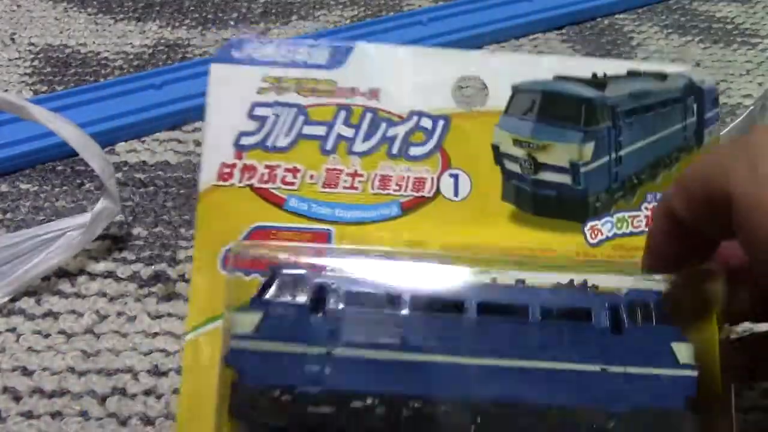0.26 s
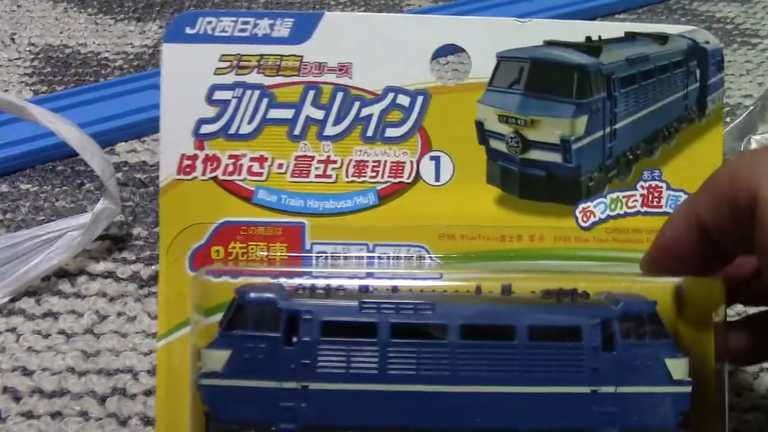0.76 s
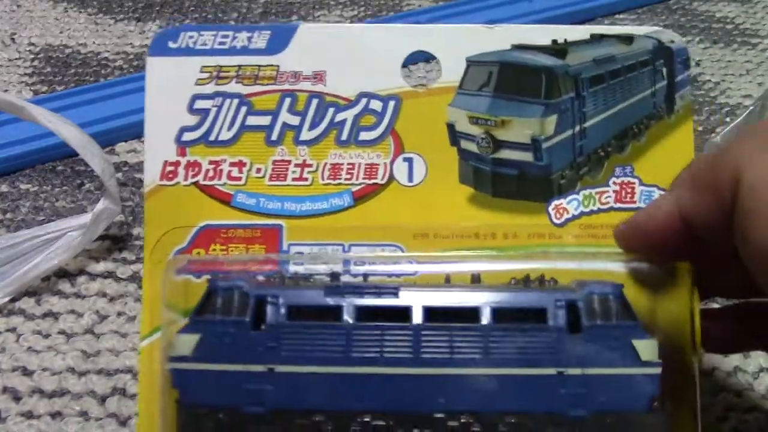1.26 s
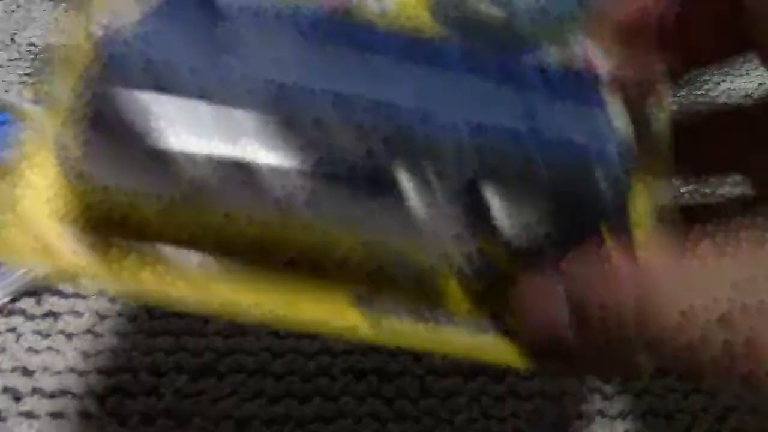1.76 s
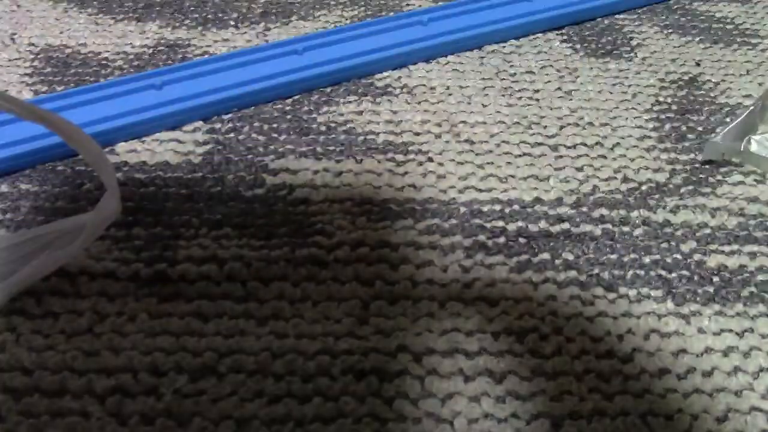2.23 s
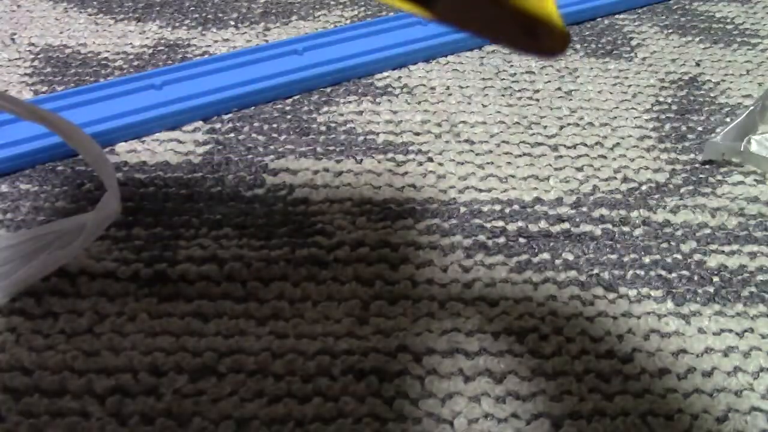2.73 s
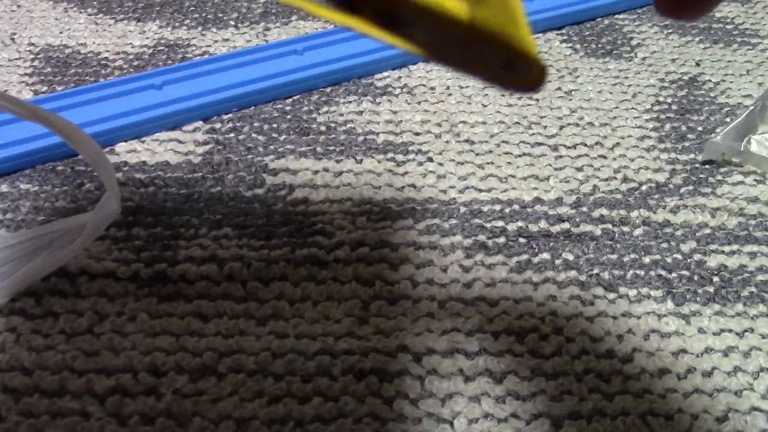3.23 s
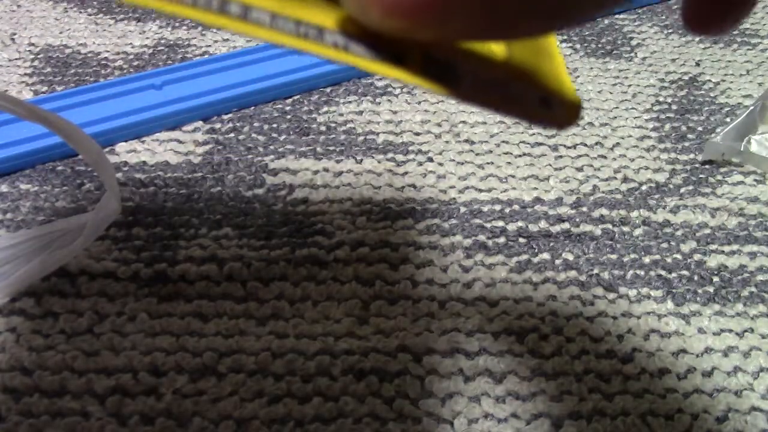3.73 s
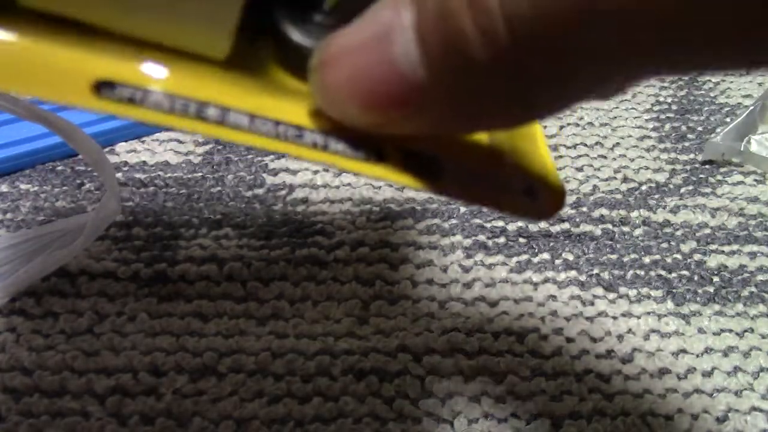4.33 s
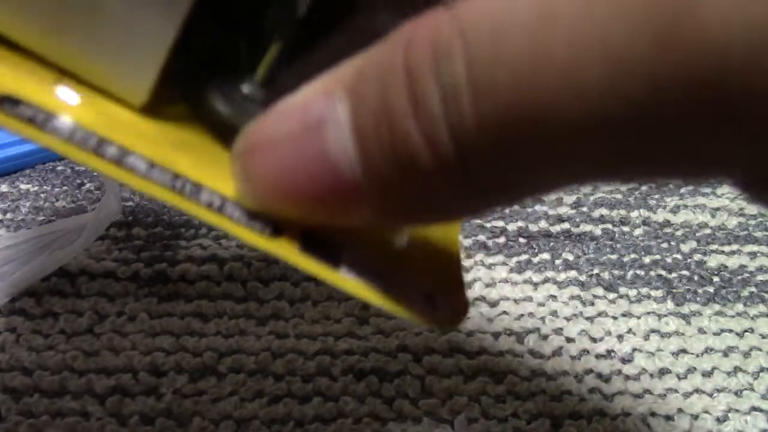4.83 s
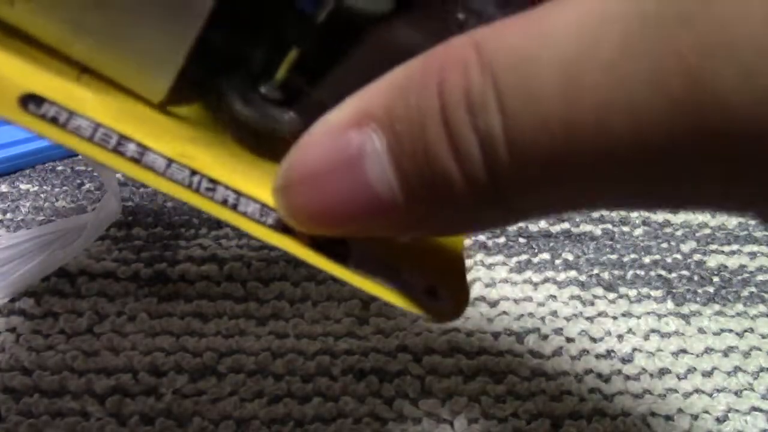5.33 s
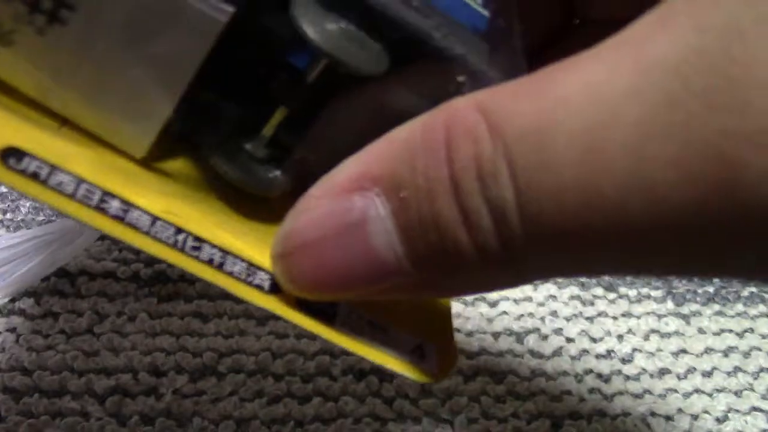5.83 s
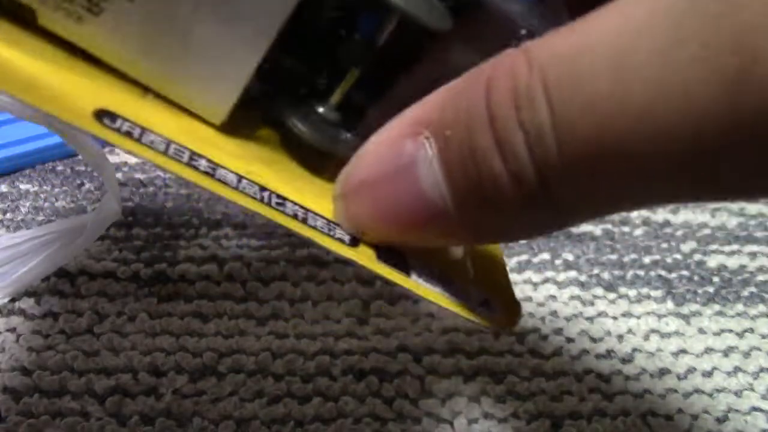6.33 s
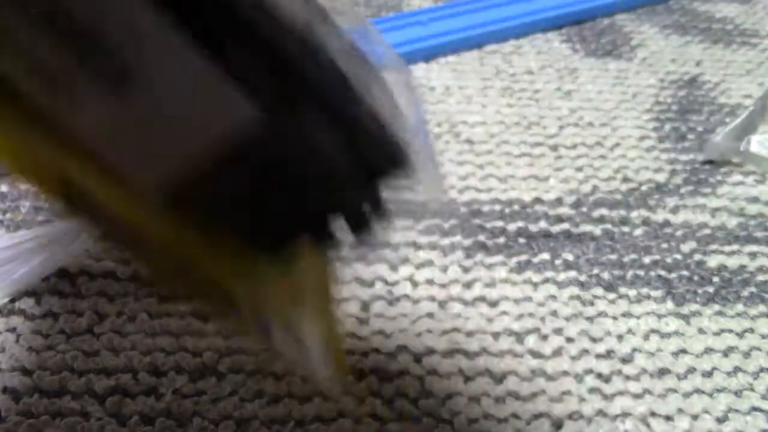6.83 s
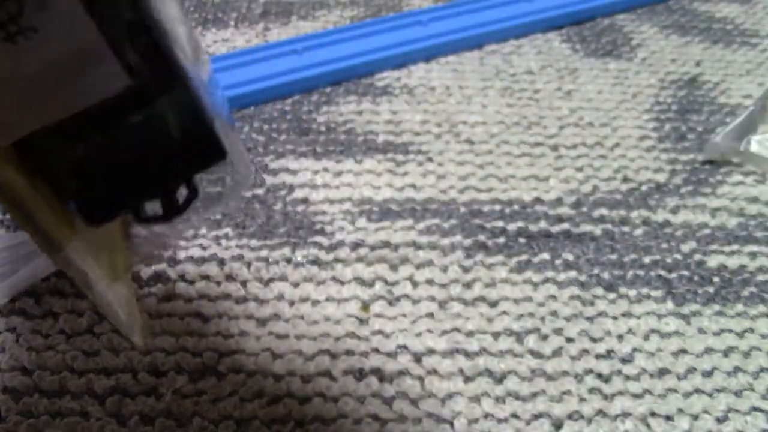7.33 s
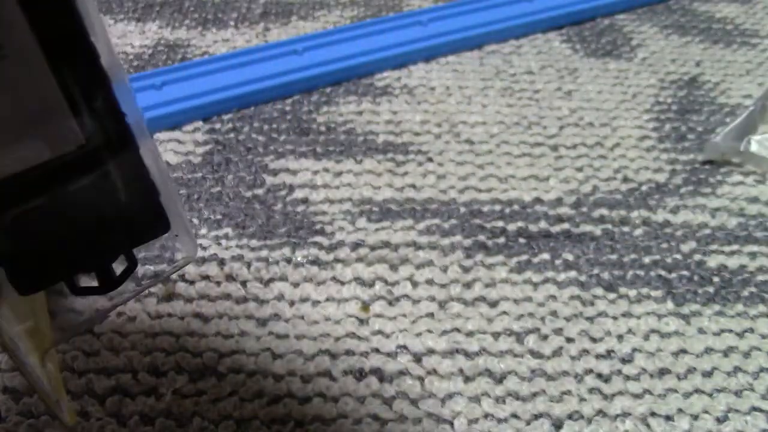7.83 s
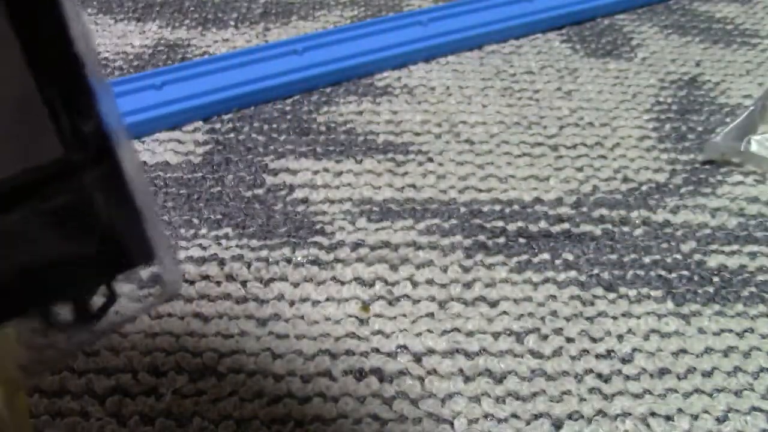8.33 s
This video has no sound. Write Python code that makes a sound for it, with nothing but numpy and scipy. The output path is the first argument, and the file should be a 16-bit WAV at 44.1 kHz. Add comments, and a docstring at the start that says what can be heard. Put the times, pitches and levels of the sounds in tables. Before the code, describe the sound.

Stiff clear plastic is gripped, turned and pressed indoors at close range. Quiet crinkles come first, then strong hollow pops around three to five seconds with brief ripping grit, a hard double crack after six, thinner clicks, and a rush of crisp high ticks and scratchy friction near the end. Low electrical hum and soft hiss stay constant.

```python
"""The stiff shell of a plastic blister pack buckles with hollow pops: damped modes, noise and short blows.
Hands turn, squeeze and tear the pack close by: stick-slip noise rubs, swells and rattles after pops, bright
ticks of brief noise and a ringing tone stand alone or give a pop its treble, a thumb drags along the rim
and the seal rips in fast runs of slips or a swelling burst. A short room tail, mains hum (a wavering sine)
and the hiss of room and microphone (shaped noise) join in."""
import sys
import numpy as np
from scipy import signal
from scipy.io import wavfile
from scipy.ndimage import uniform_filter1d

SR = 44100
rng = np.random.default_rng(int(sys.argv[2]) if len(sys.argv) > 2 else 0)


def store_pcm(level_fs):
    """Save levels as 16-bit WAV."""
    pcm = np.round(np.clip(level_fs, -1, 1) * 32767).astype(np.int16)
    wavfile.write(sys.argv[1], SR, np.atleast_2d(pcm).T)


N = 377937

# Buckling of the shell: t/s, nominal peak level/dB, dent pitch f/Hz, slope above f [dB/octave],
# card thud level/dB (rms re the peak)
BUCKLES = [(0.019, -22, 1030, -7, -47), (0.245, -39, 969, -11, -30), (0.559, -31, 875, -5, -34),
           (1.275, -39.5, 400, -25, -4), (1.551, -31, 444, -7.5, -20), (1.65, -18, 1840, -7.5, -18.5),
           (1.679, -31, 790, -10.5, -10.5), (2.17, -32, 855, -13, -34), (2.457, -29, 1390, 1, -41),
           (2.475, -32, 1000, -2, -33), (2.513, -32.5, 1000, -9, -31), (2.567, -38.5, 2870, -12, -24),
           (3.0679, -19.5, 1190, -2, -26), (3.0727, -13, 980, -7.5, -29), (3.112, -30, 3300, -17, -40),
           (3.125, -16.5, 3160, 1.5, -50), (3.395, -31, 1070, -1, -42), (3.617, -5, 880, -5, -29),
           (3.773, -18, 1600, -5.5, -27), (3.883, 0, 1035, -8.5, -21), (3.918, -27, 2920, -25, -31),
           (4.124, -36, 1030, -3, -9), (4.197, -33.5, 1410, -13, -16), (4.321, -33, 961, -5, -12),
           (4.344, -29, 1370, -10, -15.5), (4.423, -30.5, 1900, -16, -27), (4.436, -32.5, 851, -9, -20),
           (4.574, -13, 1290, -7.5, -27), (4.588, -22, 1340, 1, -18), (4.653, -29, 415, -3, -12),
           (4.694, -26.5, 1950, -19, -7.5), (4.721, -29, 680, -4, -17), (4.744, -35, 690, -13, -9),
           (4.8, -24, 1800, -10, -15.5), (4.823, -34.5, 1460, -14, -5), (4.839, -5, 1410, -16, -17),
           (4.932, -25.5, 1000, 2.5, -35), (5.088, -32, 1330, -8, -9), (5.252, -30, 856, -15.5, -10.5),
           (5.407, -24.5, 829, -4, -16.5), (5.432, -17.5, 805, -7, -18), (5.589, -18, 1150, -16, -21.5),
           (5.778, -34.5, 452, -4, -11), (5.794, -29.5, 420, -3, -13), (5.825, -33, 450, -4, -11),
           (5.86, -34.5, 703, -4, -9), (6.015, -23.5, 760, -34, -13.5), (6.404, -31.5, 810, -2, -10),
           (6.445, -34, 1770, -5, -11), (6.4997, 3.5, 2700, -3, -32), (6.576, 4, 915, -4, -30.5),
           (6.683, -27.5, 902, -14, -11), (6.919, -11.5, 860, -8.5, -20.5), (6.972, -31, 840, -11.5, -11.5),
           (7.206, -26.5, 744, -7.5, -16), (7.681, -27.5, 1100, -8.5, -11), (7.806, -25, 830, -32.5, -18),
           (8.25, -29, 750, -11, -20), (8.334, -35.5, 1360, -13, -19), (8.393, -29, 832, -12, -17),
           (8.429, -25, 794, -5, -14), (8.459, -19.5, 434, -9, -19), (8.479, -10.5, 810, -19.5, -21),
           (8.499, -13, 1030, -7, -19.5), (8.521, -16, 1330, -11, -27)]
# Short bright ticks, some being the treble of a pop: t/s, nominal peak level/dB, f/Hz
BRIGHT_TICKS = [(1.651, -20.5, 6950), (2.1535, -33.5, 3060), (3.076, -11, 3430), (3.7751, -19.5, 6300),
                (4.24, -13.5, 10940), (4.3, -38, 4130), (4.5156, -44, 9000), (4.5406, -38, 9000),
                (5.4016, -29, 11200), (5.4337, -24, 3130), (5.592, -33, 11300), (5.6855, -46, 10600),
                (5.7152, -29.5, 10800), (5.809, -27, 11400), (5.8184, -36, 13100), (5.8294, -40, 12000),
                (5.8651, -38, 7640), (6.0392, -37, 3300), (6.5, -8, 4350), (6.5007, -4, 8400),
                (6.9194, -15.5, 3700), (7.117, -23.5, 5300), (7.187, -28, 8300), (7.272, -24, 6370),
                (7.2826, -26, 6560), (7.6036, -33.5, 3700), (7.612, -34, 3600), (7.645, -36, 6770),
                (7.683, -28.5, 6940), (7.713, -33, 5720), (7.789, -30, 8540), (7.8, -26.5, 3760),
                (7.818, -24, 3820), (7.827, -24, 4040), (7.84, -22, 4000), (7.8632, -25, 3940),
                (7.868, -23, 13100), (7.892, -6.5, 14100), (7.9011, -13, 12700), (7.9552, -26.5, 8350),
                (8.0253, -28, 12900), (8.085, -24, 10500), (8.112, -27, 10600), (8.1194, -17.5, 9040),
                (8.183, -17, 7900), (8.197, -8, 8000), (8.2102, -9.5, 6950), (8.2278, -10.5, 3770),
                (8.2366, -25, 5070), (8.2795, -23.5, 7960), (8.3116, -29, 5700), (8.4306, -30, 3670),
                (8.479, -25.5, 3740), (8.522, -21, 3620)]
# Fast ripping of the seal: start t/s, fade time t/s, level/dB before gating, mean slip rate f/Hz,
# brightness [0-1]
SEAL_RIPS = [(4.574, 0.026, -17, 320, 0.58), (4.596, 0.032, -28, 320, 0.5),
             (8.526, 0.024, -33.5, 310, 0.03)]
# Fingers on the pack: t/s, dull rustle level/dB, bright scrape level/dB
RUB_LEVELS = [(0.0, -37, -49.5), (0.14, -55.5, -60), (0.62, -59.5, -71.5), (1.24, -56.5, -67.5),
              (2.05, -64.5, -78), (2.29, -57.5, -64.5), (2.6, -60, -74), (3.94, -67.5, -79),
              (4.2, -53.5, -68), (4.55, -51.5, -56.5), (4.74, -43.5, -54.5), (4.92, -59, -63),
              (5.4, -58, -67), (6.2, -60.5, -73), (6.56, -44.5, -50.5), (6.76, -65, -97), (7.22, -48, -51),
              (7.55, -57, -61.5), (8.2, -61.5, -47), (8.45, -55, -67.5), (8.57, -43, -49)]
# Short soft-edged bursts of friction noise (rubs, rattle after pops, a swelling rip):
# start t/s, length t/s, dull level/dB, bright level/dB, bright tilt [dB/octave]
NOISE_SWELLS = [(0.162, 0.16, -53, -58.5, 1), (1.5, 0.051, -53, -68, 4), (1.891, 0.042, -49, -56, -5),
                (2.057, 0.076, -52.5, -57, -8), (2.135, 0.073, -45.5, -56, -7),
                (2.338, 0.14, -46.5, -51, -10), (2.894, 0.069, -47.5, -56, 2),
                (3.09, 0.076, -49.5, -54, -13), (3.88, 0.11, -47, -71, 2), (4.536, 0.099, -40.5, -40.5, 1),
                (4.679, 0.07, -50, -47, 5), (4.784, 0.078, -41, -48.5, 6), (5.085, 0.021, -47.5, -54, 1),
                (5.178, 0.16, -51.5, -57.5, 3), (5.373, 0.11, -47, -56, 8), (5.65, 0.27, -55.5, -50, 7),
                (5.993, 0.23, -49.5, -54.5, -1), (6.651, 0.15, -47.5, -55, -4.5),
                (7.377, 0.13, -62, -50.5, -5), (7.585, 0.22, -62, -57.5, 6), (7.765, 0.2, -48.5, -41, 12),
                (7.943, 0.12, -68, -45.5, 10), (8.076, 0.089, -52, -39, 8),
                (8.148, 0.13, -40.5, -30.5, 0.5), (8.468, 0.072, -36, -47.5, 2)]
# Thumb drag along the rim: start t/s, length t/s
THUMB_TIME = (4.15, .7)
# Thumb resonance in a hollow of the shell: level/dB, f/Hz, bandwidth [Hz]
THUMB_RESONANCE = (-59, 4430, 360)

# Nominal modes of the shell: f/Hz, relative level/dB, 60 dB decay time t/s
SHELL_MODES = [(503.5, -5, 0.03), (693, -4, 0.035), (855, 4, 0.04), (1041, 2, 0.035), (1300, 3, 0.035),
               (1500, 5, 0.022), (1830, 4, 0.028), (2232, -1, 0.022), (2763, 7, 0.022), (3273, 7, 0.018),
               (4080, 3, 0.018), (5570, 1, 0.016)]
# Nominal modes of the backing card: f/Hz, relative level/dB, 60 dB decay time t/s
CARD_MODES = [(174.4, 8.5, 0.04), (216, 2, 0.082), (332, 10, 0.031), (403.5, -6.5, 0.13)]
# Spectrum of the dull rustle: f/Hz, relative level/dB
RUSTLE_SPECTRUM = [(150, -16), (260, 6.5), (450, -11), (700, 2.5), (1200, 4.5), (2300, -2), (3300, -3.5),
                   (4400, -7.5), (6000, -10.5), (9000, -35)]
# Spectrum of the bright scrape: f/Hz, relative level/dB
SCRAPE_SPECTRUM = [(1500, -67), (2600, 2.5), (3300, -5.5), (3900, 6.5), (4800, 3.5), (6200, 2), (7000, 6),
                   (7900, 5), (9000, 3.5), (10600, 2), (12000, 1.5), (15900, -3), (16600, -38.5)]
# Treble lift of a fast rip over a scrape: f/Hz, relative level/dB
RIP_TREBLE_GAIN = [(3000, -6), (13000, 12)]
# Spectrum of room and microphone hiss: f/Hz, relative level/dB
HISS_SPECTRUM = [(12, -40), (20, 0), (35, -9.5), (55, -34.5), (121, -20.5), (174, -20.5), (750, -26),
                 (1240, -33), (1790, -30.5), (3830, -43.5), (6530, -42.5), (13900, -51.5), (15900, -55),
                 (16500, -75)]
# Left-right likeness of the hiss: f/Hz, correlation [0-1]
HISS_LIKENESS = [(60, 0.98), (180, 0.48), (550, 0.37), (1650, 0.64), (4970, 0.64), (15000, 0.64)]

HISS_DB = -51.5  # rms
HUM_HZ, HUM_DB = 120.4, -49.5  # rms level before the waver
OFFSET, EDGE_HZ = .0097, 16800  # constant offset (full scale = 1); upper band limit
HARD_DB, HARD_WIDTH_DB = -12, 10.5  # pop level that is half hard; softness of that transition
RING_SOFT, RING_HARD = 1, 0.55  # factors on decay time: a hard squeeze damps the ring
GIVE_SOFT_S, GIVE_HARD_S = .003, 0.00086  # time a dent takes to give way
DAMP_S, LATE_DB = 0.0034, -3  # the gripping fingers soon damp the ring by this much
CRUNCH_DB, CRUNCH_T60_S = 2, 0.031  # small creases with a dent: peak re the ring; soft-pop decay time
SNAP_DB, SNAP_TOP_HZ = 5.5, 5020  # blow of a fully hard pop: peak re the ring; dent spectrum dull above this
CRINKLE_PER_S, CRINKLE_SPREAD_DB = 48, 2.5  # mean rate of dents, and of edge snaps; spread of their level
DENT_DB, EDGE_DB = 9.5, 12  # least crinkle peaks above the rustle and the scrape
FILM_DB = 4.5  # spread of random peaks and dips in the colour of each noise swell
SIDES = np.array([[1], [-1]])  # left, right


def amp(db):
    """Level definition: decibels to an amplitude ratio."""
    return 10 ** (np.asarray(db) / 20)


def evened(x):
    """Normalisation to unit rms."""
    return x / np.sqrt(np.mean(x ** 2) + 1e-20)


def read(points, hz):
    """Interpolation of a spectrum along a logarithmic frequency axis."""
    f, value = np.transpose(points)
    return np.interp(np.log(hz + 1), np.log(f + 1), value)


def add(mix, s, sound):
    """Superposition: adds a sound to the mix from s seconds, in place."""
    part = mix[..., round(s * SR):][..., :sound.shape[-1]]
    part += sound[..., :part.shape[-1]]


def colour(x, points):
    """Minimum-phase filtering: a causal filter takes its phase from its log-gain spectrum."""
    hz = abs(np.fft.fftfreq(2048, 1 / SR))
    log_gain = np.log(amp(np.maximum(read(points, hz), -100)))
    taps = np.fft.ifft(np.exp(np.conj(signal.hilbert(log_gain)))).real[:1024]
    return signal.oaconvolve(x, taps)[:len(x)]


def ring(modes, extra_db, longer, chance, rise_s):
    """Modal superposition: decaying sines of random detuning, strength and phase swell as a dent gives way."""
    hz, db, t60 = np.transpose(modes)[:, :, None]
    t = np.arange(4000) / SR
    detune, strength, phase = chance[:, :len(modes), None]
    tone = np.sin(2 * np.pi * hz * (1 + 0.047 * detune) * t + 0.47 * phase)
    fall = amp(db + extra_db + 2 * strength - 60 * t / (t60 * longer))
    return (tone * fall).sum(0) * (1 - np.exp(-(t / rise_s) ** 2))


def slips(per_s, spread_db, t60, smooth):
    """Stick-slip friction: noise in small sudden puffs of uneven size over a smooth part."""
    size = amp(spread_db * np.minimum(rng.exponential(1, N), 4))
    size = size * (rng.random(N) < per_s / SR)
    puffs = signal.lfilter([1], [1, -amp(-60 / (t60 * SR))], size)
    return evened(rng.standard_normal(N) * (smooth + evened(puffs)))


def rub():
    """Sliding friction: a dull rustle through card and shell and a brighter, wider scrape."""
    s, dull_db, bright_db = np.transpose(RUB_LEVELS)
    t = np.arange(N) / SR
    rustle = evened(colour(slips(90, 0.73, 0.29, 0.3), RUSTLE_SPECTRUM))
    near, wide = (evened(colour(slips(160, 0.87, 0.02, 1.0), SCRAPE_SPECTRUM)) for _ in range(2))
    scrape = near + .3 * SIDES * wide
    return rustle * amp(np.interp(t, s, dull_db)) + scrape * amp(np.interp(t, s, bright_db))


def crinkle():
    """Random impulse excitation: small dents and edge snaps follow the strength of the rubbing."""
    s, dull_db, bright_db = np.transpose(RUB_LEVELS)
    t, out = np.arange(N) / SR, np.zeros(N)
    dent_db = np.interp(t, s, dull_db) + DENT_DB
    edge_db = np.interp(t, s, bright_db) + EDGE_DB
    for chance in rng.standard_normal((8, 4, len(SHELL_MODES))):  # eight variants share the rate
        dent = ring(SHELL_MODES, 2.7 * chance[3, :, None], 0.29, chance[:3], 0.00072)
        snap = colour(rng.standard_normal(600) * amp(-60 * t[:600] / 0.016), SCRAPE_SPECTRUM)
        for grain, db in ((dent, dent_db), (snap, edge_db)):
            size = amp(db + CRINKLE_SPREAD_DB * np.minimum(rng.exponential(1, N), 4))
            strikes = size * (rng.random(N) < CRINKLE_PER_S / 8 / SR)
            out += signal.oaconvolve(strikes, grain / abs(grain).max())[:N]
    return out


def hiss():
    """Partially correlated random noise: room and microphone hiss, faintly patchy in time and frequency."""
    frames, hz = N // 256 + 5, np.fft.rfftfreq(1024, 1 / SR)
    a, b, c, d, patches = rng.standard_normal((frames, 513, 5)).T
    patches = evened(uniform_filter1d(uniform_filter1d(patches, 12, 0), 14, 1))
    same = np.clip(read(HISS_LIKENESS, hz), -1, 1)[:, None]
    left = a + 1j * b
    right = same * left + np.sqrt(1 - same ** 2) * (c + 1j * d)
    spectrum = np.array([left, right]) * amp(read(HISS_SPECTRUM, hz)[:, None] + 1.8 * patches)
    noise = signal.istft(spectrum, nperseg=1024, noverlap=768)[1][:, :N]
    return amp(HISS_DB) * evened(noise)


def hum():
    """Amplitude modulation: a sine of fixed pitch wavers slightly in level."""
    waver = evened(uniform_filter1d(uniform_filter1d(rng.standard_normal(N), 3000), 3000))
    tone = np.sin(2 * np.pi * HUM_HZ * np.arange(N) / SR)
    return np.sqrt(2) * amp(HUM_DB + 0.079 * waver) * tone


def room(x):
    """Reverberant decay: a short, soft tail of sparse taps of random sign, treble dying first."""
    taps = np.zeros((2, 12000))
    at = np.arange(200, 11980, 20) + rng.integers(0, 20, (2, 589))
    np.put_along_axis(taps, at, rng.choice([-1., 1.], at.shape), 1)
    hz, t, z = signal.stft(taps + 0.64 * taps[::-1], SR, nperseg=256)
    t60 = read([(300, 0.16), (2000, 0.075), (10000, 0.068)], hz)[:, None]  # f/Hz, t/s
    tail = signal.istft(z * amp(-60 * t / t60), SR, nperseg=256)[1]
    return signal.fftconvolve(x, tail / np.linalg.norm(tail[0]), axes=1)[:, :N]


def pops():
    """Snap-through buckling: a dent rings nearby shell modes, with crunch, crack, blow and card thud."""
    out, t = np.zeros(N), np.arange(4000) / SR
    shell_hz = np.array(SHELL_MODES)[:, :1]
    chances = rng.standard_normal((len(BUCKLES), 6 * len(SHELL_MODES) + len(t)))
    for (s, db, hz, slope_db, thud_db), row in zip(BUCKLES, chances):
        noise, chance = row[:len(t)], row[len(t):].reshape(-1, len(SHELL_MODES))
        octaves = np.log2(shell_hz / hz)

        # louder pops are harder: they give way sooner, ring shorter and carry more of the blow
        hard = 1 / (1 + np.exp((HARD_DB - db) / HARD_WIDTH_DB))
        longer = RING_SOFT + (RING_HARD - RING_SOFT) * hard
        give = GIVE_SOFT_S * (GIVE_HARD_S / GIVE_SOFT_S) ** hard
        grip = amp(LATE_DB * (1 - np.exp(-((t - give) / DAMP_S) ** 2)) * (t > give))
        swell = (1 - np.exp(-(t / give) ** 2)) * grip

        top_db = slope_db * np.log2(SNAP_TOP_HZ / hz) - 7.0
        dent = [(hz / 4, -20), (hz / 1.15, -4), (hz, 0), (1.51 * hz, slope_db - 3),
                (SNAP_TOP_HZ, top_db), (2 * SNAP_TOP_HZ, top_db - 34)]  # f/Hz, level/dB

        mode_db = np.where(octaves > 0, slope_db, 7.) * octaves
        modes = ring(SHELL_MODES, mode_db, longer, chance[:3], give) * grip
        rattle = evened(signal.lfilter(*signal.butter(2, 350, fs=SR), noise[::-1]))
        modes = modes * (1 + .6 * rattle)  # the shell rattles
        crunch = colour(noise * swell * amp(-60 * t / (CRUNCH_T60_S * longer)), dent)
        blow = colour(signal.unit_impulse(len(t), round(give * SR)), dent)
        crack = colour(noise * swell * amp(-60 * t / 0.018), SCRAPE_SPECTRUM)
        modes, crunch, blow, crack = (x / abs(x).max() for x in (modes, crunch, blow, crack))

        body = modes + amp(CRUNCH_DB) * crunch - hard * amp(SNAP_DB) * blow
        body = body / abs(body).max()
        thud = ring(CARD_MODES, 0, longer, chance[3:], 0.0024)
        thud = thud / np.std(thud[:440])  # unit level over the first 10 ms
        add(out, s, amp(db) * (body + amp(-30.5) * crack + amp(thud_db) * thud))
    return out


def noise_swells():
    """Windowed friction noise: slightly grainy, soft-edged bursts, each with its own random colour."""
    out = np.zeros((2, N))
    dull = evened(colour(slips(340, 8.4, 0.017, 1.4), RUSTLE_SPECTRUM))
    near, wide = (colour(slips(260, 3.5, .008, .8), SCRAPE_SPECTRUM) for _ in range(2))
    film_hz = np.linspace(2000, 16000, 24)
    films = rng.standard_normal((len(NOISE_SWELLS), len(film_hz)))
    for (s, length, dull_db, bright_db, tilt_db), film in zip(NOISE_SWELLS, films):
        span = slice(round(s * SR), round((s + length) * SR))
        film_gain_db = tilt_db * np.log2(film_hz / 2000) + FILM_DB * film
        tilt = np.transpose([film_hz, film_gain_db])
        mid, side = (evened(colour(x[span], tilt)) for x in (near, wide))
        sound = amp(dull_db) * dull[span] + amp(bright_db) * (mid + .35 * SIDES * side)
        add(out, s, sound * signal.windows.tukey(len(mid), .6))
    return out


def ticks():
    """Damped impulse: brief noise, duller above the tick's pitch, and a decaying sine at that pitch."""
    out, t = np.zeros((2, N)), np.arange(600) / SR
    chances = rng.standard_normal((len(BRIGHT_TICKS), 2, 600))
    for (s, db, hz), (noise, other) in zip(BRIGHT_TICKS, chances):
        both = (noise + .25 * SIDES * other) * amp(-60 * t / 0.011)
        dulling = [(hz, 0), (4 * hz, -9)]  # f/Hz, level/dB
        tick = np.array([colour(colour(side, SCRAPE_SPECTRUM), dulling) for side in both])
        tone = np.sin(2 * np.pi * hz * t) * amp(-60 * t / 0.005)
        tick = tick / abs(tick).max() + 1.35 * tone
        add(out, s, tick / abs(tick).max() * amp(db + .9 * SIDES))
    return out


def thumb():
    """Resonance under friction: stick-slip noise rings in one hollow of the shell."""
    (s, length), (db, hz, width) = THUMB_TIME, THUMB_RESONANCE
    out = np.zeros(N)
    drag = signal.lfilter(*signal.iirpeak(hz, hz / width, fs=SR), slips(180, 1.5, .02, 1.2))
    size = round(length * SR)
    add(out, s, amp(db) * evened(drag)[:size] * signal.windows.tukey(size, .3))
    return out


def rips():
    """Repeated stick-slip fracture: fast runs of slips with a sharp start and a fading end."""
    out, t = np.zeros((2, N)), np.arange(6000) / SR
    drive = rng.standard_normal((len(SEAL_RIPS), 3, 6000))
    for (s, length, db, per_s, bright), (noise, other, jitter) in zip(SEAL_RIPS, drive):
        rate = per_s * np.exp(.5 * evened(uniform_filter1d(jitter, 150)))
        turns = np.cumsum(rate) / SR
        slip = .35 + np.exp(-(turns % 1) / .25)
        gate = slip * np.clip(t / 0.0015, 0, 1) / (1 + (t / length) ** 6)
        dull = evened(colour(noise, RUSTLE_SPECTRUM))
        mid, side = (evened(colour(colour(x, SCRAPE_SPECTRUM), RIP_TREBLE_GAIN)) for x in (noise, other))
        sharp = mid + .3 * SIDES * side
        add(out, s, amp(db) * gate * (np.clip(1 - bright, 0, 1) * dull + bright * sharp))
    return out


def scene():
    """Superposition of the pack's sounds, their room tail and the steady background."""
    pack = rub() + crinkle() + pops() * amp(.15 * SIDES) + noise_swells() + ticks() + thumb() + rips()
    # the pack's sounds carry no deep bass below about 110 Hz
    pack = signal.lfilter(*signal.butter(2, 110, "high", fs=SR), pack)
    return pack + amp(-21.5) * room(pack) + hiss() + hum()


def record(dry):
    """Saturation and band limiting: the converter adds a small offset and clips the loudest pops."""
    clipped = np.clip(dry + OFFSET, -.95, .95)
    band_limit = signal.firwin(511, EDGE_HZ, window=("kaiser", 9), fs=SR)
    return signal.oaconvolve(clipped, band_limit[None], "same")


dry = scene()
out = record(dry)
store_pcm(out)
```